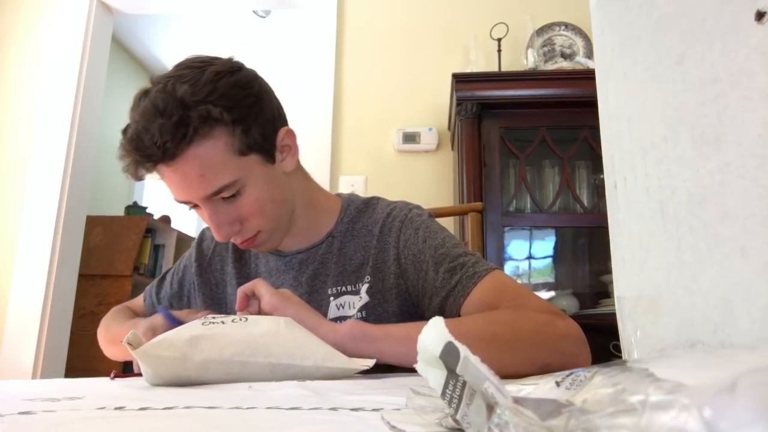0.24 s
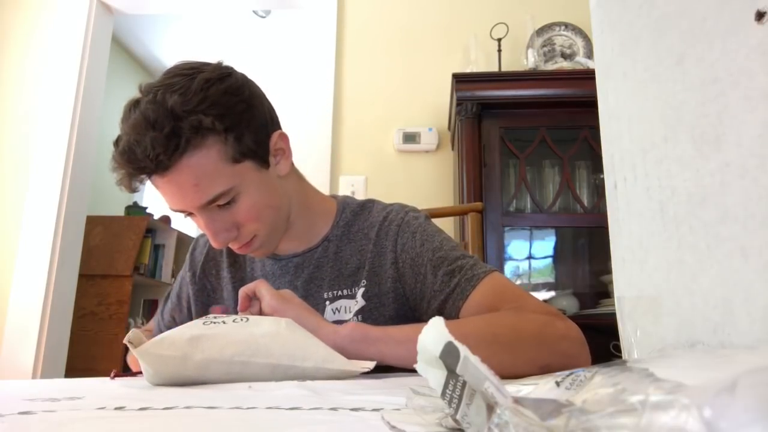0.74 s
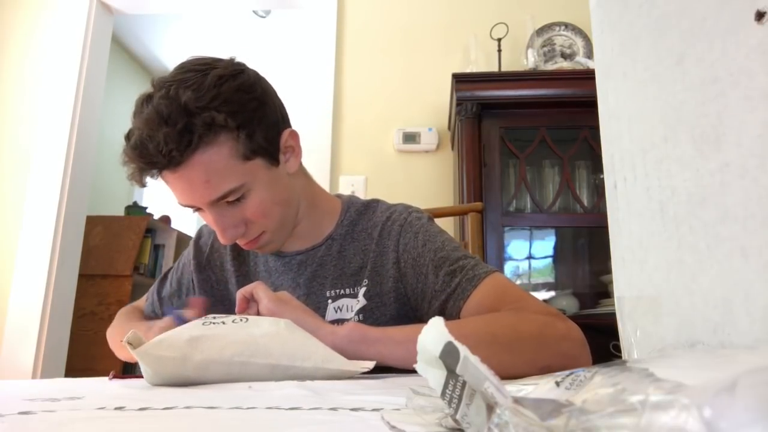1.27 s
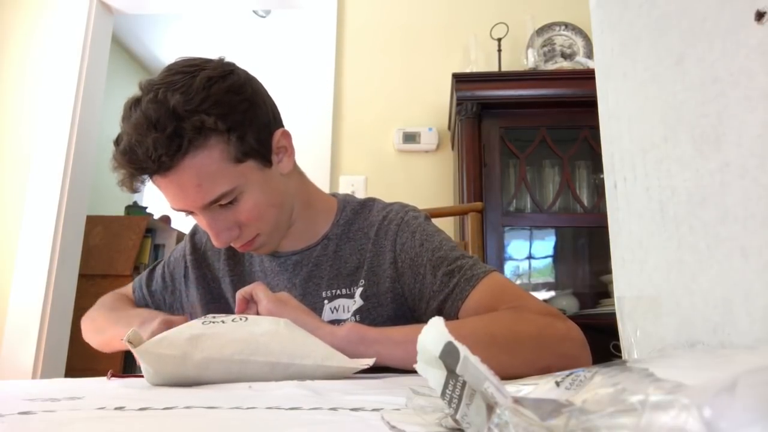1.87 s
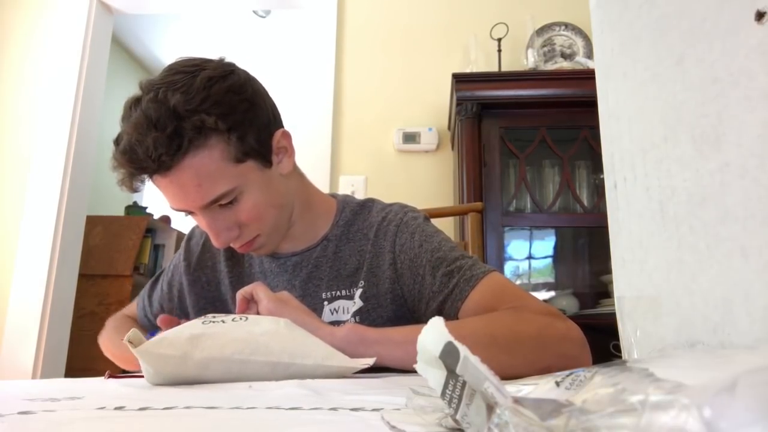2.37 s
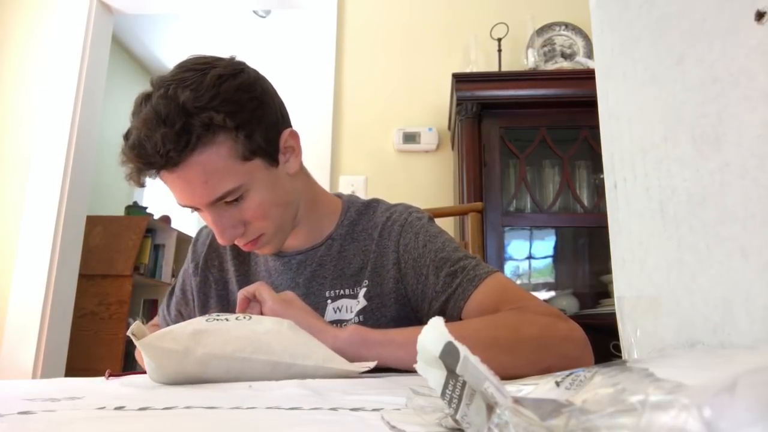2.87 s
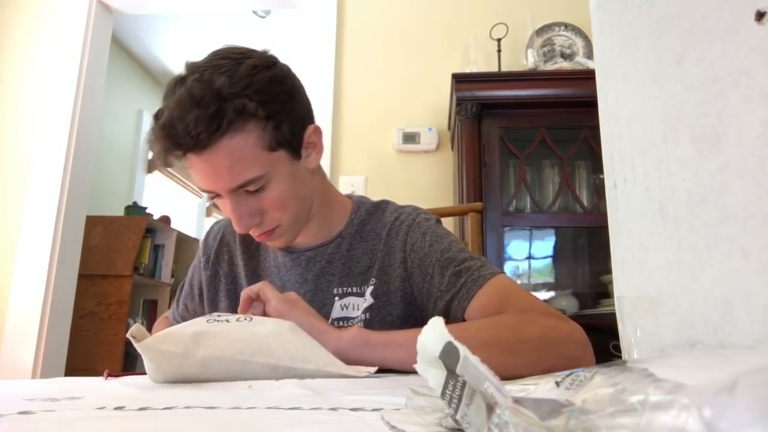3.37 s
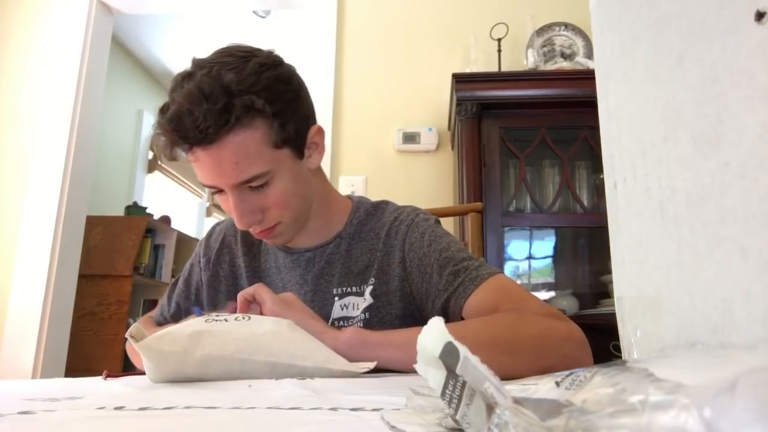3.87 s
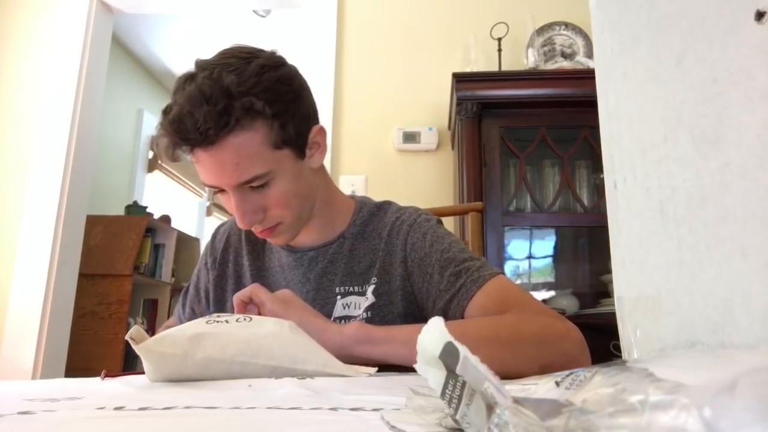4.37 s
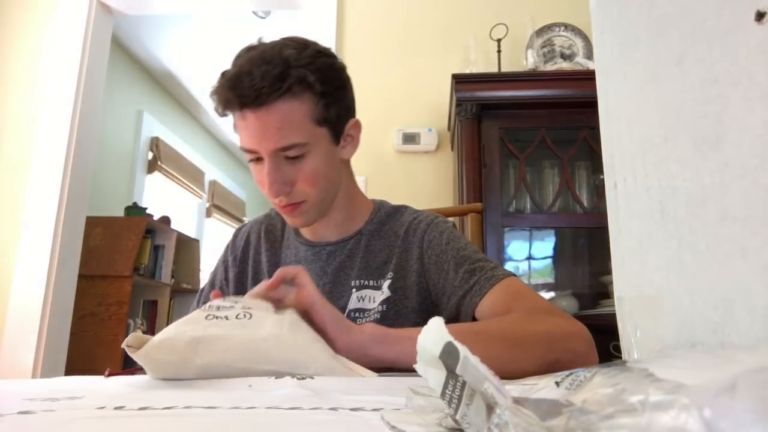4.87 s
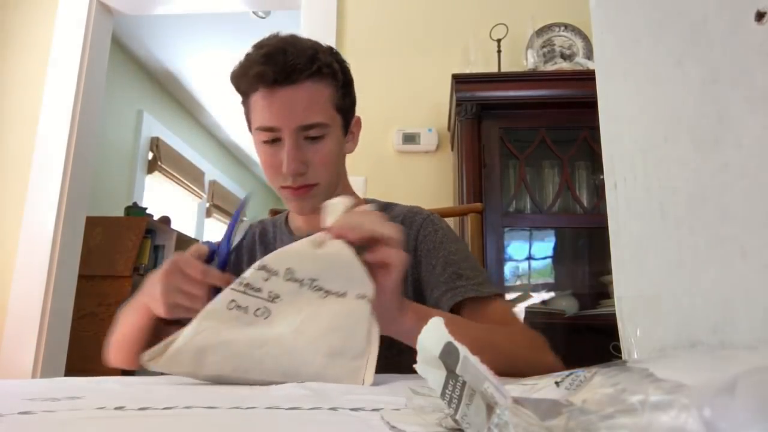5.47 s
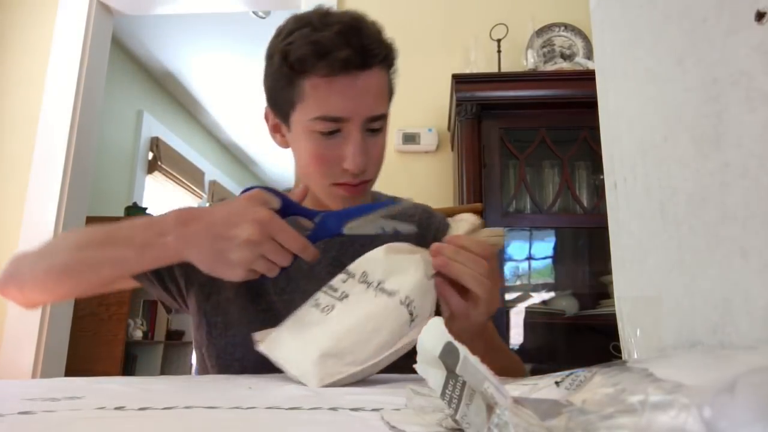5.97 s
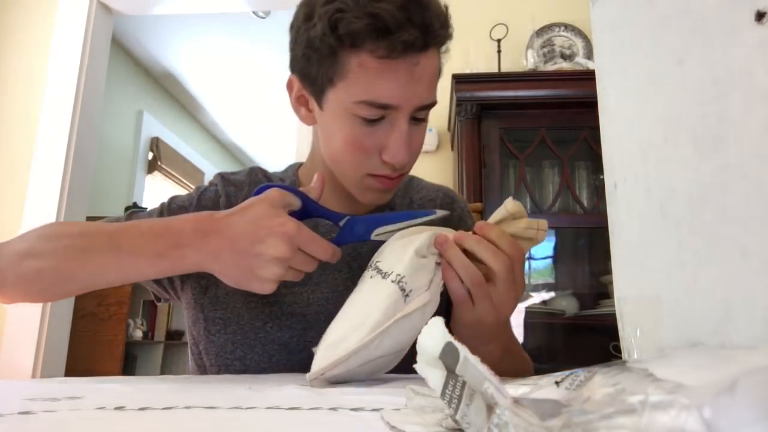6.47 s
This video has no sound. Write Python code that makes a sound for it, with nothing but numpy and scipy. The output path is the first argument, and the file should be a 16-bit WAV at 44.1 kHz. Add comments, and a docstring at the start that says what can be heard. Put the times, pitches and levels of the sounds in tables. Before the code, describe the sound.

Hands knock on a wooden table as scissors clack and tick at a zip tie, then a canvas bag rustles and crinkles.

```python
"""First come two quick bumps on a wooden table and a rustle of cloth, in a small room where an appliance
hums faintly. Scissors work at a plastic zip tie round a canvas bag: the strained tie ticks, and the steel
blades clack shut twice. Hands and scissor handles bump the table and make the wood ring briefly, while
bag and forearms rub over it. At the end the bag is lifted, and its threads rustle and its folds crinkle."""
import sys
import numpy as np
from scipy import signal
from scipy.fft import rfft, irfft, next_fast_len
from scipy.io import wavfile

SR = 44100
rng = np.random.default_rng(int(sys.argv[2]) if len(sys.argv) > 2 else 0)


def pcm_store(signal):
    """Save signal as 16-bit PCM."""
    levels = np.round(np.clip(np.atleast_2d(signal), -1, 1) * 32767)
    wavfile.write(sys.argv[1], SR, levels.astype(np.int16).T)


N = 296383
TIME = np.arange(N) / SR
HIT_TIME = np.arange(SR // 3) / SR   # the clock for one short hit, in seconds


def from_db(db):
    """Turns decibels into a number to multiply by."""
    return 10 ** (np.asarray(db) / 20)


def at_hz(points, hz):
    """Reads between the rows of a table, giving every octave equal space."""
    freqs, values = np.transpose(points)
    return np.interp(np.log(hz), np.log(freqs), values)


def cut(x, hz, keep="low", order=2):
    """Keeps the low or the high side of hz; a higher order cuts more steeply."""
    return signal.sosfilt(signal.butter(order, min(hz, .45 * SR), keep, fs=SR, output="sos"), x)


def colour(x, spectrum):
    """Gives a steady sound its balance of bass and treble, at an average power of 1."""
    size = next_fast_len(N)
    hz = np.maximum(np.fft.rfftfreq(size, 1 / SR), 1)
    shaped = irfft(rfft(x, size) * from_db(at_hz(spectrum, hz)), size)[:N]
    return shaped / np.sqrt(np.mean(shaped ** 2) + 1e-20)


def drift(turns_per_s):
    """A random wander, typically about 1 either side of zero."""
    points = rng.standard_normal(int(N / SR * turns_per_s) + 2)
    return np.interp(TIME * turns_per_s, np.arange(len(points)), points)


def since(start_s):
    """Seconds gone by since a moment; zero before it."""
    return np.maximum(TIME - start_s, 0)


def ring(tones, spread_db):
    """A struck object rings in tones, the wider the shorter; each blow mixes them a little differently."""
    pitch_hz, width_hz, level_db = np.transpose(tones)[:, :, None]
    strength = width_hz * from_db(level_db + spread_db * rng.standard_normal(pitch_hz.shape))
    sign = (-1) ** np.arange(len(pitch_hz))[:, None]
    fade = np.exp(-np.pi * width_hz * HIT_TIME)
    return np.sum(sign * strength * fade * np.sin(2 * np.pi * pitch_hz * HIT_TIME), axis=0)


def smear(hit, width_hz, count):
    """Bending waves arrive spread over a millisecond or two: each filter delays one band of the click."""
    radius = np.exp(-np.pi * width_hz / SR)
    for hz in rng.uniform(500, 16000, count):
        poles = [1, -2 * radius * np.cos(2 * np.pi * hz / SR), radius * radius]
        hit = signal.lfilter(poles[::-1], poles, hit)
    return hit


def crack(width_hz):
    """A brittle snap with no pitch: a smeared click without bass, at energy 1."""
    click = signal.unit_impulse(len(HIT_TIME))
    burst = cut(smear(click, width_hz, count=30), 1600, "high")
    return burst / np.linalg.norm(burst)


def scuff(hit, slip_s, grip_s):
    """One push and a spray of tiny slips; a spray longer than grip_s outweighs the push."""
    slips = rng.standard_normal(len(HIT_TIME)) * np.exp(-HIT_TIME / slip_s)
    force = np.sqrt(slip_s / grip_s) * slips / np.linalg.norm(slips)
    force[0] += 1
    return signal.fftconvolve(hit, force)[:len(hit)]


# how long the room's echo takes to fall by 60 dB: pitch_hz, fade_s
ECHO_FADES = [(60, .3), (150, .3), (420, .39), (1100, .34), (3000, .33), (7500, .3), (15000, .25)]
# how loud that echo is next to the direct sound: pitch_hz, level_db
ECHO_LEVELS = [(80, -6), (200, -2.5), (500, 2.5), (1300, -5), (2600, -4.5), (6500, 0.5), (9500, 0),
               (15000, -3)]
# bounces off hard surfaces near by: delay_s, level_db
BOUNCES = [(.0073, -4.5), (.0118, -10), (.0228, -12), (.0282, -13)]
def room_response():
    """The room answers a click: the direct sound, four early bounces and a wash of fading echo."""
    t = np.arange(int(.7 * SR)) / SR
    edges_hz = np.geomspace(40, 19000, 15)
    build_up = np.clip((t - .006) / .005, 0, 1)
    noise, response = rng.standard_normal((2, len(t))), np.zeros(len(t))
    for k, (low, high) in enumerate(zip(edges_hz, edges_hz[1:])):
        hz = np.sqrt(low * high)
        fade = build_up * from_db(-60 * t / at_hz(ECHO_FADES, hz))
        band_filter = signal.butter(2, [low, high], "band", fs=SR, output="sos")
        band = signal.sosfilt(band_filter, noise[k % 2] * fade)
        strength = from_db(at_hz(ECHO_LEVELS, hz)) * np.sqrt(2 * (high - low) / SR)
        response += strength * band / np.linalg.norm(band)
    bounces = np.zeros(len(t))
    for delay_s, level_db in BOUNCES:
        bounces[round(delay_s * SR)] = from_db(level_db)
    response += cut(bounces, 5500, "high", order=1)   # a small hard surface returns mostly treble
    response[0] += 1
    return response


def drier(room, echo_db):
    """The same direct sound with weaker echoes."""
    return np.r_[1, room[1:] * from_db(echo_db)]


def add_hit(out, start_s, hit, level_db, room):
    """Lays a hit with its echoes into the track; its level is its energy spread over 30 ms."""
    start = round(start_s * SR)
    hit = signal.fftconvolve(hit, room)
    hit = hit * from_db(level_db) * np.sqrt(.03 * SR / np.sum(hit ** 2))
    out[start:start + len(hit)] += hit[:N - start]


# the appliance's tones: pitch_hz, level_db
HUM_TONES = [(97, -71.5), (188, -73), (333.8, -70)]
# the hush of the room, from bass to treble: pitch_hz, level_db
AIR_COLOUR = [(18, -78), (35, 2.5), (95, 2), (280, -3.5), (328, -5), (415, -5), (760, -8.5), (1010, -6),
              (1760, -16), (4300, -23), (4910, -31.5), (6720, -25), (10500, -34.5), (14400, -30.5),
              (16000, -34)]
def hum_and_air():
    """An appliance hums, wavering slightly, over the hush of still air."""
    hum = np.zeros(N)
    for pitch_hz, level_db in HUM_TONES:
        strength = from_db(level_db + 1.5 * drift(4)) * np.sqrt(2)
        hum += strength * np.sin(2 * np.pi * pitch_hz * TIME + .9 * drift(14))
    return hum + from_db(-61.5) * colour(rng.standard_normal(N), AIR_COLOUR)


# rubbing on wood, from bass to treble: pitch_hz, level_db
RUB_COLOUR = [(40, 4), (65, 14), (110, 13), (200, 9.5), (400, 5), (750, -9.5), (1200, -10), (2200, -24),
              (3700, -31.5), (5200, -47.5), (16000, -76)]
# drags over the table: middle_s, half_length_s, level_db, tilt_db_per_octave
DRAGS = [(0.963, 0.057, -54, -4), (1.276, 0.22, -58.5, 3), (1.503, 0.03, -59, 11.5),
         (1.812, 0.12, -54.5, 1), (2.2, 0.026, -53.5, 4), (3.393, 0.074, -53.5, -1),
         (3.933, 0.055, -54, -0.5), (4.47, 0.016, -41, 1), (5.528, 0.066, -61, 3), (5.83, 0.022, -51, 8.5),
         (6.442, 0.019, -56.5, 3.5)]
def rubbing():
    """Bag and forearms drag over the table in murmurs that swell and fade, each with its own tilt towards bass
    or treble."""
    out, friction = np.zeros(N), rng.standard_normal(N)
    for middle_s, half_length_s, level_db, tilt in DRAGS:
        spectrum = [(hz, db + tilt * np.log2(hz)) for hz, db in RUB_COLOUR]
        swell = np.exp(-((TIME - middle_s) / half_length_s) ** 2 / 2)
        out += colour(friction, spectrum) * from_db(level_db) * swell
    return out * from_db(2.2 * drift(40))


# tugs at the bag: start_s, level_db, rise_s, settle_s
CLOTH_TUGS = [(0.017, -62, 0.0036, 0.52), (0.67, -65, 0.0032, .12), (3.72, -68, 0.0044, 0.23),
              (3.8, -67.5, 0.038, 0.18), (4.612, -60, 0.015, 0.061), (4.76, -63.5, .06, 0.12),
              (4.88, -59, 0.018, .11), (5.2, -61, 0.03, .09), (5.29, -57.5, 0.016, 0.071),
              (5.96, -59, 0.13, 0.076), (6.22, -61, 0.11, 0.12), (6.45, -60, 0.025, 0.15)]
def cloth_motion():
    """How strongly the cloth moves: constant light fingering, the lift and the tugs add up in power."""
    fingers_db, top_db, top_s, held_s = -74, -58.5, 5.47, 5.86
    # the lift swells to its top, eases while the bag is turned, and dies once it is held up
    lift_db = top_db - 20 * np.maximum(top_s - TIME, 0) - 7.5 * since(top_s) - 10 * since(held_s)
    power = from_db(fingers_db) ** 2 + from_db(lift_db) ** 2
    for start_s, level_db, rise_s, settle_s in CLOTH_TUGS:
        rise = np.minimum(since(start_s) / rise_s, 1)
        settle = np.exp(-since(start_s + rise_s) / settle_s)
        power += (from_db(level_db) * rise * settle) ** 2
    return np.sqrt(power)


# the rustle of canvas, from bass to treble: pitch_hz, level_db
RUSTLE_COLOUR = [(50, -20), (220, -7), (500, -9), (784, -9.5), (946, -3), (1250, -3), (1600, -4.5),
                 (1930, -7), (2540, -6), (6140, -11), (10400, -21), (13800, -17.5), (16000, -40)]
# the fine crackle of tight threads: pitch_hz, level_db
CRACKLE_COLOUR = [(500, -30), (2500, -0.5), (6500, 1), (10400, -15), (14000, -8), (16000, -10)]
def canvas():
    """Threads catch and slip in clumps, tight ones crackle, and now and then a fingernail snags."""
    slips_per_s, snags_per_s, crackles_per_s = 14000, 22, 1500
    slip_sizes = from_db(2.8 * np.minimum(rng.exponential(1, N), 4)) * rng.standard_normal(N)
    slips = slip_sizes * (rng.random(N) < slips_per_s / SR)
    snags = from_db(21.5) * rng.uniform(.5, 1.3, N) * (rng.random(N) < snags_per_s / SR)
    clumps = from_db(1.25 * drift(turns_per_s=110))
    crackle = rng.standard_normal(N) * (rng.random(N) < crackles_per_s * clumps ** 2 / SR)
    rustle = colour(slips * clumps + snags, RUSTLE_COLOUR)
    return (rustle + from_db(-11) * colour(crackle, CRACKLE_COLOUR)) * cloth_motion()


# folds of canvas giving way: start_s, level_db, lowest_hz, fade_s
FOLDS = [(0.681, -73, 2760, 0.0043), (1.71, -67, 2290, 0.012), (4.732, -70.5, 2200, .004),
         (4.926, -67, 2490, .004), (4.992, -70, 4480, 0.005), (5.237, -60, 2220, .012),
         (5.3, -62, 2330, 0.0096), (5.382, -73, 2520, 0.0043), (5.421, -63, 2000, .012),
         (5.421, -63, 13000, .008), (5.773, -65, 5000, 0.0091), (5.989, -61.5, 2020, 0.0071),
         (6.033, -63, 2620, 0.0058), (6.05, -70, 2600, 0.0045), (6.17, -73, 3465, .004)]
def crinkles(room):
    """A fold of stiff canvas buckles in a quick, uneven run of little snaps."""
    out, snaps_per_s = np.zeros(N), 3400
    for start_s, level_db, lowest_hz, fade_s in FOLDS:
        snaps = rng.standard_normal(len(HIT_TIME)) * (rng.random(len(HIT_TIME)) < snaps_per_s / SR)
        run = cut(snaps * np.exp(-HIT_TIME / fade_s), lowest_hz, "high", order=4)
        add_hit(out, start_s, cut(run, lowest_hz * 1.4), level_db, room)
    return out


# the tones of the table top: pitch_hz, width_hz, level_db
WOOD_TONES = [(55, 34, 2), (86.5, 36, 5.5), (122.5, 75, 0.5), (189, 58, 1), (238, 60, 0), (287.7, 24, 1.5),
              (370.4, 38, 0), (497, 65, -4), (612, 40, -1), (967, 87, -1), (1180, 45, -1.5),
              (1310, 87, -4.5), (1615, 70, -1), (2070, 210, -4.5), (2460, 320, -7.5), (3360, 970, -11),
              (7600, 8700, -25.5)]
# hands and scissors landing: start_s, thud_db, thud_hz, knock_db, brightness_hz
TABLE_BUMPS = [(0.028, -35, 218, -36.5, 2120), (0.0621, -39, 270, -41.5, 1450),
               (0.3194, -47.5, 162, -52.5, 1090), (1.073, -35.5, 96, -45.5, 830),
               (1.093, -32, 259, -62, 323), (1.103, -40, 94, -55, 342), (1.315, -58, 250, -53.5, 1200),
               (1.3739, -39.5, 290, -47.5, 900), (2.222, -34, 252, -39, 877),
               (2.989, -52.5, 198, -57.5, 1690), (3.094, -49, 167, -60.5, 1400),
               (3.1414, -37, 280, -45.5, 2150), (3.1446, -28.5, 99.3, -53, 405),
               (3.445, -49.5, 135, -61, 800), (3.559, -44.5, 290, -48, 1440),
               (4.005, -36.5, 307, -48, 1100), (4.0976, -44.5, 201, -43.5, 2130),
               (4.342, -36, 87, -79, 150), (4.438, -44, 300, -52, 1680), (4.688, -51, 130, -78, 509),
               (4.891, -42.5, 193, -61, 600), (5.523, -56.5, 222, -78, 700), (6.459, -58, 132, -75, 600)]
def table_bumps(room):
    """A hand's weight thuds in the wood's low tones; a harder edge knocks out more of the high ones."""
    out, hard_edge_hz = np.zeros(N), 2000
    for start_s, thud_db, thud_hz, knock_db, brightness_hz in TABLE_BUMPS:
        wood = ring(WOOD_TONES, spread_db=1.8)
        thud = cut(wood, thud_hz * 1.36, order=3)
        add_hit(out, start_s, cut(thud, thud_hz * .26, "high"), thud_db, room)
        # a softer edge scuffs for longer and is heard with less echo
        octaves_softer = np.log2(hard_edge_hz / brightness_hz)
        slip_s = .0004 + .0085 * max(octaves_softer, 0)
        echoes = drier(room, echo_db=-6 - 1.5 * octaves_softer)
        knock = cut(scuff(wood, slip_s, grip_s=.0028), 348, "high", order=3)
        knock = cut(knock, brightness_hz, order=4) + from_db(-23) * knock
        add_hit(out, start_s, knock, knock_db, echoes)
    return out


# the tones of the scissor handles: pitch_hz, width_hz, level_db
HANDLE_TONES = [(510, 104, -1.5), (670, 110, -2), (887, 78, 4.5), (1110, 200, 1), (1320, 150, 4),
                (1640, 240, -1), (1890, 180, 0.5), (2530, 460, -7.5), (3600, 600, -12), (4450, 540, -17.5),
                (9600, 4600, -54)]
# the handles hitting the table: start_s, level_db
HANDLE_RAPS = [(2.2209, -31), (2.2264, -40), (2.2298, -44)]
def handles():
    """Hard plastic chatters on wood, each touch at a new spot with its own echoes; loose blades snap."""
    out = np.zeros(N)
    for start_s, level_db in HANDLE_RAPS:
        room = room_response()
        plastic = cut(ring(HANDLE_TONES, spread_db=1), 200, "high")
        add_hit(out, start_s, scuff(plastic, slip_s=.004, grip_s=.0062), level_db, room)
        steel_snap = cut(crack(width_hz=1200), 6540, "high")
        add_hit(out, start_s, cut(steel_snap, 8500), level_db - 24, room)
    return out


# the tie ticking under the blades: start_s, level_db, pitch_hz, overtone_hz, overtone_db, brightness_hz
TIE_TICKS = [(0.7782, -52.5, 2730, 4440, -8, 4900), (1.0708, -57, 2440, 4330, -20, 2700),
             (1.1023, -64, 2920, 4130, -5, 5640), (1.223, -64.5, 2150, 4300, -4, 6760),
             (1.3116, -46, 2580, 5740, -20, 13500), (2.5668, -56, 2330, 5800, -10, 5600),
             (2.568, -56.5, 3180, 5560, -17, 5100), (2.6428, -66, 2470, 5640, -7, 6850),
             (3.4045, -64.5, 2260, 5590, -13, 5930), (3.5602, -55.5, 2580, 4300, -10, 6470),
             (4.203, -68, 4130, 5950, -8, 11000)]
def zip_tie(room):
    """The strained strap gives way in ticks: two short tones heard close up and a room-filling crack."""
    out, width_hz, overtone_width_hz = np.zeros(N), 270, 700
    for start_s, level_db, pitch_hz, overtone_hz, overtone_db, brightness_hz in TIE_TICKS:
        tones = [(pitch_hz, width_hz, 0), (overtone_hz, overtone_width_hz, overtone_db)]
        strap = smear(ring(tones, spread_db=1), width_hz=1500, count=14)
        strap = cut(strap, pitch_hz * .7, "high")
        add_hit(out, start_s, cut(strap, brightness_hz), level_db, drier(room, echo_db=-10))
        snap = cut(crack(width_hz=2300), brightness_hz, order=3)
        add_hit(out, start_s, snap, level_db - 3.5, room)
    return out


# the blades' tones, all but two thin ones muffled by the hand: pitch_hz, width_hz, level_db
STEEL_TONES = [(990, 120, 0), (1600, 900, -12), (2430, 160, -2), (3450, 300, 4), (3520, 5, 8),
               (4700, 600, -8), (6680, 8, 5), (6740, 480, 4), (9650, 300, -7), (13400, 900, -3),
               (15600, 900, -8)]
# the blades clacking shut: start_s, ring_db, crack_db, brightness_hz
BLADE_SNIPS = [(1.3699, -34.5, -39, 16000), (3.5582, -57, -53, 11000)]
def blades(room):
    """The blades shear through with a sharp crack; closed hard, the steel rings out as well."""
    out = np.zeros(N)
    for start_s, ring_db, crack_db, brightness_hz in BLADE_SNIPS:
        steel = smear(ring(STEEL_TONES, spread_db=.8), width_hz=2200, count=24)
        # the steel rings straight at the listener, so it raises less echo than the crack
        add_hit(out, start_s, steel, ring_db, drier(room, echo_db=-3.5))
        snap = cut(crack(width_hz=2400), brightness_hz, order=1)
        add_hit(out, start_s, snap, crack_db, room)
    return out


def scene():
    """All the hits sound in one small room, over the rustle, the rubbing and the hum."""
    room = room_response()
    hits = blades(room) + zip_tie(room) + handles() + table_bumps(room) + crinkles(room)
    return (hits + canvas() + rubbing() + hum_and_air())[None]


def record(dry):
    """The microphone drops the deepest bass; the highest treble is cut steeply."""
    thinned = cut(dry, 48, "high", order=6)
    return signal.sosfilt(signal.ellip(10, .2, 80, 15800, fs=SR, output="sos"), thinned)


dry = scene()
out = record(dry)
pcm_store(out)
```